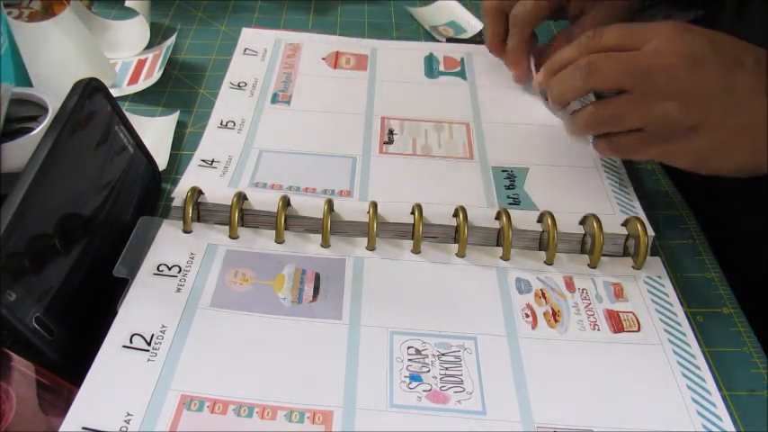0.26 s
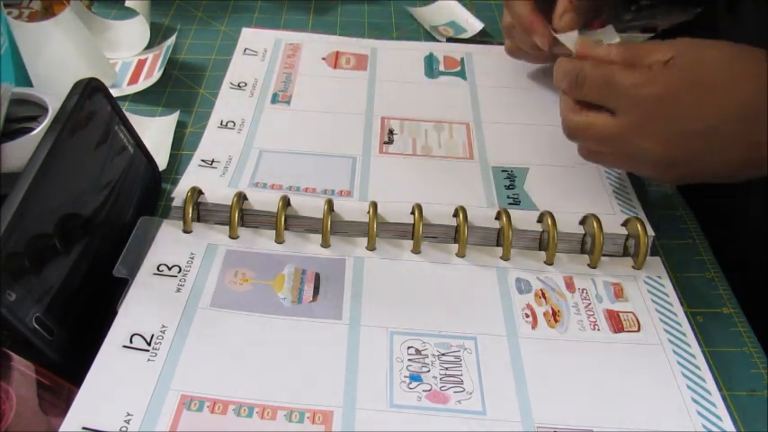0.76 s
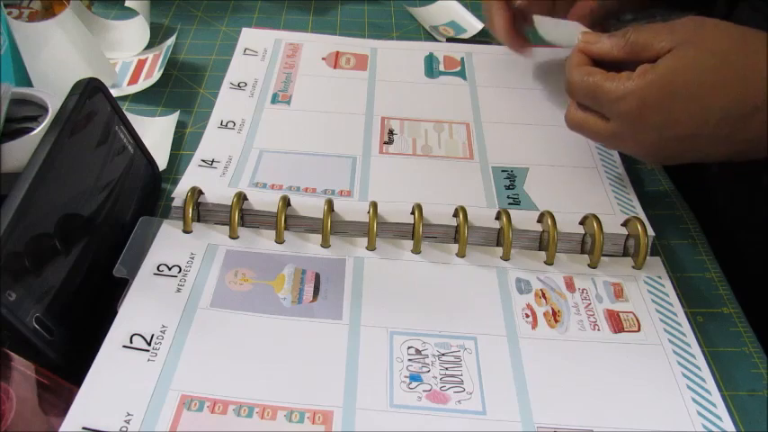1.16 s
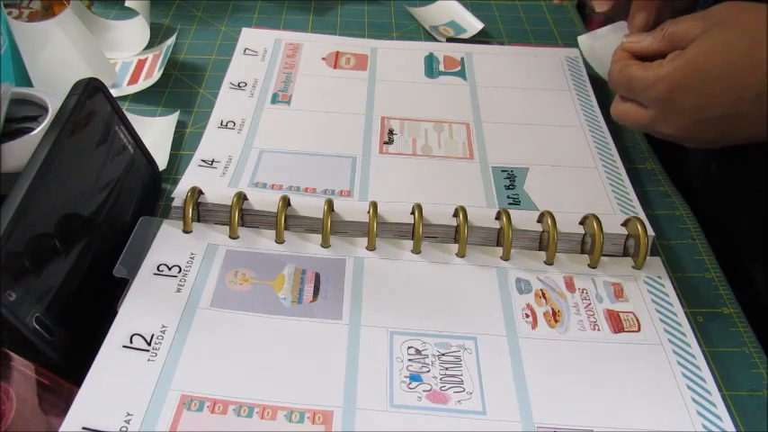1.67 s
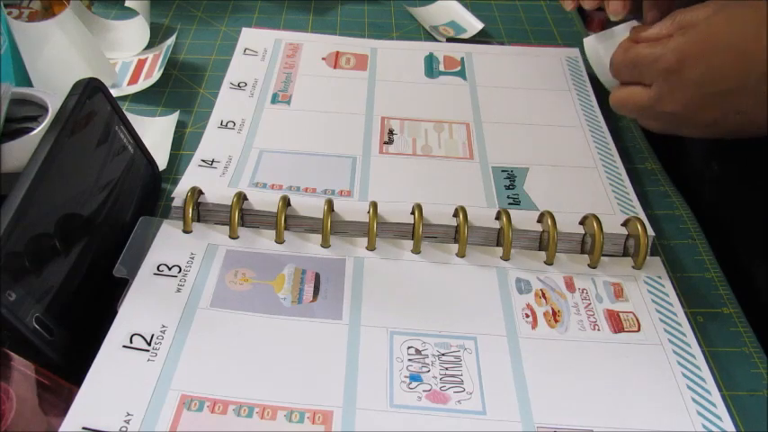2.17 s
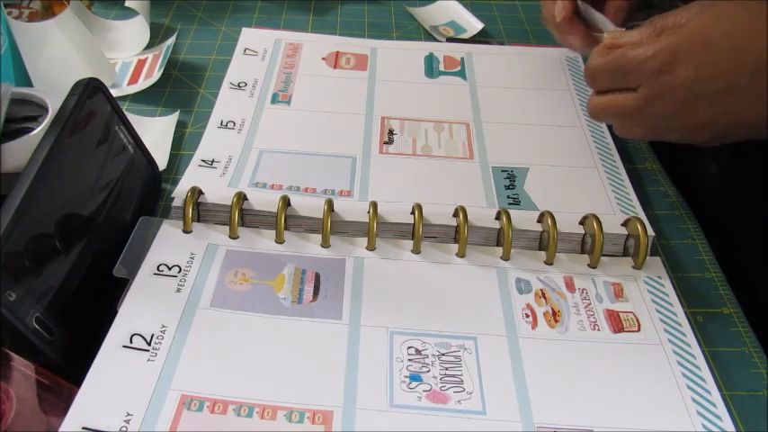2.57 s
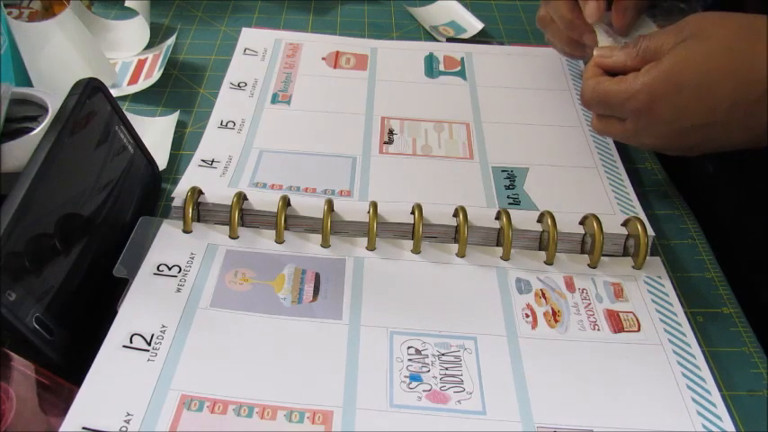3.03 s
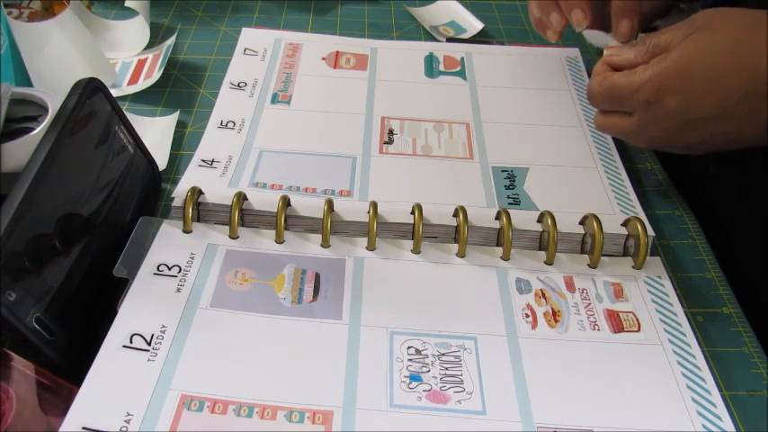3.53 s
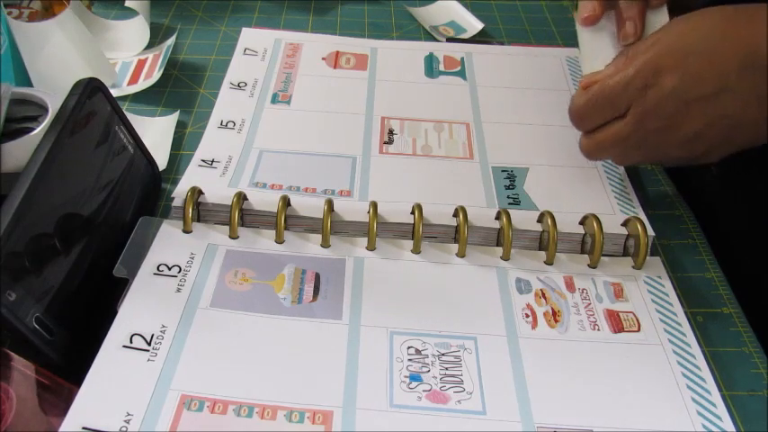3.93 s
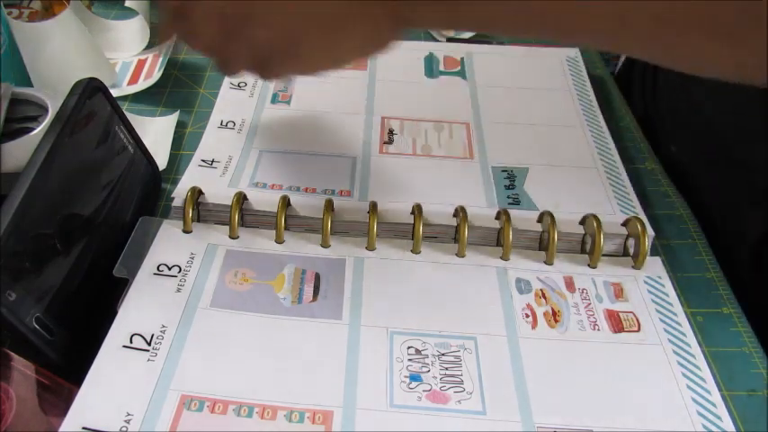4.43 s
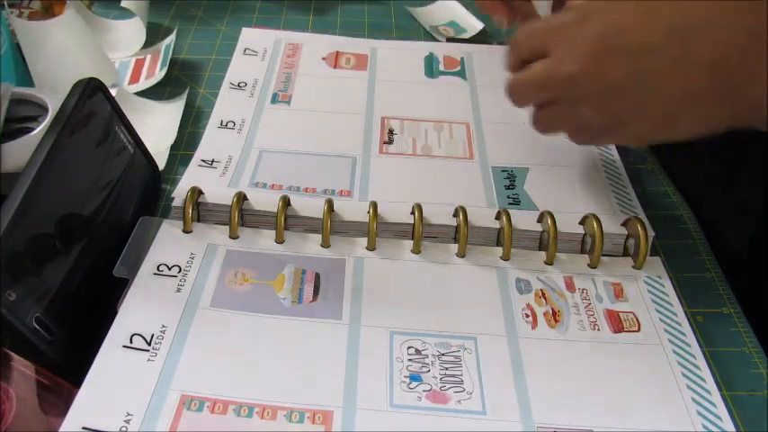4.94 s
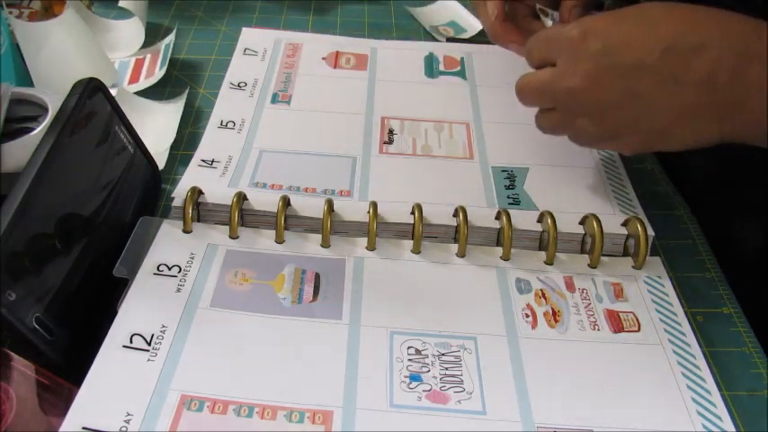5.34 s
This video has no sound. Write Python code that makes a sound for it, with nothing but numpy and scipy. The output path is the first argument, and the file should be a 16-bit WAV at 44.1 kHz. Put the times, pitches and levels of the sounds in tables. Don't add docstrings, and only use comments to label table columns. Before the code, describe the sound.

Quiet desk work: soft paper rustling and tiny crackles, then a sheet slaps down with brisk snaps, while a machine hums faintly behind.

```python
import sys
import numpy as np
from scipy import signal
from scipy.fft import rfft, irfft, next_fast_len
from scipy.io import wavfile
from scipy.ndimage import uniform_filter1d

SR = 44100
rng = np.random.default_rng(int(sys.argv[2]) if len(sys.argv) > 2 else 0)


def store_pcm(level_fs):
    pcm = np.round(np.clip(level_fs, -1, 1) * 32767).astype(np.int16)
    wavfile.write(sys.argv[1], SR, np.atleast_2d(pcm).T)


def level_to_linear(level):
    exponent = np.asarray(level, float) / 20
    return 10 ** exponent


N = 246959

# (frequency [Hz], density [dB per Hz])
ROOM_MID_COLOUR = [(33, -21), (48, 5), (80, -9), (120, -3), (330, -6), (545, -13.5), (590, -34),
                   (690, -24.5), (740, -15), (1400, -18.5), (2600, -25), (3000, -29), (9000, -30),
                   (15500, -35.5)]
# (frequency [Hz], density [dB per Hz])
ROOM_SIDE_COLOUR = [(28, -30), (48, -7), (130, -4.5), (240, -6), (300, -8.5), (540, -16), (680, -31.5),
                    (850, -22.5), (1300, -27), (2000, -36), (3000, -43), (10000, -42), (15500, -46.5)]
# (frequency [Hz], width [Hz], level [dB])
MACHINE_WHINES = [(525, 29, -67.5), (617.6, 3.5, -75.5), (785, 13, -75), (2542, 24, -74.5)]
# (time [s], pitch [Hz], level [dB])
HUM_TRACK = [(0, 236.7, -47), (1.5, 235.6, -47.5), (3, 235.6, -47.5), (4.3, 236, -48.5),
             (5.6, 237.6, -46.5)]
# (frequency [Hz], t60 [s])
ECHO_T60 = [(500, 0.24), (2000, 0.13), (6000, 0.19), (12000, 0.15)]
# (frequency [Hz], likeness [0-1])
ECHO_LIKENESS = [(700, 0.19), (2000, 1), (4500, 1), (9000, 0.35), (13000, .2)]
# (delay [s], level [dB])
NEAR_BOUNCES = [(.0075, -14.5), (0.0101, -21), (0.017, -26)]
# (frequency [Hz], width [Hz], level [dB])
DESK_RESONANCES = [(274.7, 32, 6), (306, 27, 3), (354, 96, -10), (207, 9.6, -1)]
# (time [s], length [s], level [dB])
ARM_LEANS = [
    (3.88, 1, -53.5),
    (4.312, 0.53, -45),
    (4.378, 0.02, -38),
    (4.832, 0.235, -50.5),
    (5.208, 0.18, -59),
]
# (time [s], frequency [Hz], level [dB], t60 [s])
DESK_THUMPS = [
    (4.188, 114, -42.5, 0.17),
    (4.21, 440, -36, 0.039),
]
# (frequency [Hz], width [Hz], level [dB])
PAGE_RESONANCES = [(1213, 137, 5.5), (1331, 110, 7.5), (1703, 290, 7), (2300, 220, 8), (2600, 240, 0.5),
                   (3550, 270, 1)]
# (time [s], length [s], frequency [Hz], level [dB])
FINGER_SQUEAKS = [(-.04, 0.036, 5200, -59), (-.02, 0.059, 5480, -57.5), (-.02, 0.052, 2170, -64),
                  (.06, .04, 4010, -69), (.15, 0.14, 4900, -71), (.21, 0.031, 3650, -72),
                  (0.211, 0.073, 6330, -59), (0.282, 0.0071, 3440, -53), (0.291, 0.011, 4400, -54),
                  (0.433, 0.018, 2200, -66), (1.168, 0.033, 8930, -64), (1.164, 0.03, 4350, -62.5),
                  (1.363, 0.16, 4470, -71), (5.37, 0.037, 3470, -64), (0.108, 0.088, 430, -56),
                  (0.166, 0.09, 442, -59)]
# (frequency [Hz], density [dB per Hz])
FIBRE_COLOUR = [(1470, -31), (2500, -38), (2760, -2), (4110, -6.5), (4710, -2.5), (5450, -9), (6110, -6),
                (8950, -5), (14400, -6), (15500, -20)]
# (time [s], length [s], level [dB])
PEEL_STROKES = [(-.03, 0.052, -53.5), (.294, 0.085, -48.5), (.367, .11, -48), (.608, .11, -61),
                (1.079, 0.075, -60), (1.3, .12, -60.5), (1.376, 0.14, -64), (2.53, 0.15, -61),
                (2.87, .08, -66), (3.11, 0.16, -65), (3.37, .12, -61), (3.74, 0.21, -57.5),
                (4.261, 0.16, -50), (4.5, 0.083, -53), (4.607, 0.092, -53), (4.674, 0.14, -52.5),
                (5.304, 0.05, -55.5), (5.341, 0.15, -57), (5.47, 0.094, -52.5)]
# (time [s], length [s], level [dB])
SLIDE_STROKES = [(.245, 0.066, -54), (.728, 0.11, -62.5), (1.149, 0.052, -58), (1.65, .14, -65.5),
                 (2.676, 0.065, -61), (2.796, .038, -64), (3.026, 0.15, -66), (3.598, 0.27, -66.5),
                 (3.909, 0.19, -56.5), (4.045, 0.28, -50.5), (4.38, .11, -57), (4.85, 0.12, -55.5),
                 (4.933, 0.18, -59.5), (5.537, 0.057, -68)]
# (time [s], length [s], level [dB])
DRAG_STROKES = [(-.05, 0.27, -65), (.1, 0.32, -64), (.33, .15, -78), (.45, 0.16, -69), (1.0, 0.074, -62.5),
                (1.5, 0.16, -63.5), (4.78, 0.11, -65.5)]
# (time [s], peak [dB], bright centre [Hz], low ring [Hz], relative low ring [dB])
SHEET_LANDING = [
    (4.1935, -27, 3560, 2550, 1),
    (4.193, -30.5, 3700, 1290, 7.5),
    (4.2007, -27, 2600, 1100, 2),
    (4.2085, -23, 8750, 1090, -5),
    (4.2125, -16, 10000, 2300, -3.5),
    (4.2145, -10.5, 8900, 2300, -10),
    (4.2165, -14.5, 6600, 2400, -11),
    (4.2185, -20, 10400, 1095, -5),
]
# (time [s], peak [dB], bright centre [Hz], low ring [Hz], crackle time [s])
CRUMPLE_SNAPS = [
    (2.408, -39, 9400, 2510, 0.0026),
    (3.9056, -28, 3070, 2300, 0.0026),
    (4.6102, -32.5, 5700, 2470, 0.0098),
    (4.688, -39, 8140, 2480, 0.039),
]
# (time [s], peak [dB], bright centre [Hz], low ring [Hz])
TICK_SNAPS = [(2.407, -25.5, 8200, 4700), (0.912, -35, 11000, 2100), (4.344, -32.5, 7850, 1100),
              (4.4896, -23, 11500, 3320), (4.513, -31, 6800, 1410), (4.595, -37.5, 12000, 2460),
              (4.687, -33, 6300, 3430), (4.9, -26, 4900, 2400), (4.9898, -27.5, 8400, 2550),
              (5.3303, -43, 11800, 988)]
# (time [s], peak [dB], bright centre [Hz], low ring [Hz])
TAP_SNAPS = [(0.6705, -46, 3580, 1410), (0.7823, -35, 8600, 2080), (0.84, -36, 8460, 2300),
             (0.916, -38, 7100, 1910), (1.0417, -46, 3460, 2630), (3.788, -42, 9300, 1290),
             (3.9057, -26.5, 7950, 2300), (4.0864, -32.5, 2600, 1310), (4.3892, -39, 4540, 1900),
             (4.6946, -34, 6300, 1570), (4.752, -38, 11500, 2140), (4.89, -25.5, 8800, 2380),
             (4.901, -29.5, 4900, 1500), (5.3102, -48, 8850, 2300)]
# (time [s], peak [dB], bright centre [Hz])
FLICK_SNAPS = [
    (1.01, -49, 4530),
    (2.699, -45, 8000),
    (4.37, -22, 7900),
    (4.3712, -20, 8000),
    (4.9875, -25.5, 10600),
    (5.4964, -55, 9930),
    (5.5606, -41, 11100),
]
# (time [s], peak [dB], low ring [Hz])
FINGER_PATS = [
    (0.4988, -55, 1170),
    (3.909, -38, 1110),
    (4.078, -52, 1160),
    (4.157, -47, 1400),
    (4.165, -41.5, 1070),
    (5.5603, -51.5, 1390),
]


def evened(x):
    return x / np.sqrt(np.mean(x ** 2) + 1e-20)


def read(points, hz):
    f, value = np.transpose(points)
    return np.interp(np.log(hz + 1), np.log(f + 1), value)


def curve(rows):
    s, *columns = np.transpose(rows)
    return [np.interp(np.arange(N) / SR, s, c) for c in columns]


def add(mix, s, sound):
    at = round(s * SR)
    sound = sound[max(-at, 0):]
    part = mix[max(at, 0):][:len(sound)]
    part += sound[:len(part)]


def resonate(x, hz, width_hz):
    radius = np.exp(-np.pi * width_hz / SR)
    angle = 2 * np.pi * hz / SR
    b = (1 - radius ** 2) / 2
    return signal.lfilter([b, 0, -b], [1, -2 * radius * np.cos(angle), radius ** 2], x)


def body(x, modes):
    return sum(level_to_linear(db) * resonate(resonate(x, hz, 2 * width_hz), hz, width_hz)
               for hz, width_hz, db in modes)


def noise(colour, patchy_db, size=2048):
    hz = np.fft.rfftfreq(size, 1 / SR)
    real, imag, patches = rng.standard_normal((4 * N // size + 5, len(hz), 3)).T
    patches = uniform_filter1d(patches, size=12, axis=0)
    patches = evened(uniform_filter1d(patches, size=8, axis=1))
    spectra = (real + 1j * imag) * level_to_linear(read(colour, hz)[:, None] + patchy_db * patches)
    return evened(signal.istft(spectra, nperseg=size, noverlap=3 * size // 4)[1][:N])


def room_air():
    whines = sum(level_to_linear(db) * evened(resonate(rng.standard_normal(N), hz, width_hz))
                 for hz, width_hz, db in MACHINE_WHINES)
    mid = level_to_linear(-55.5) * noise(ROOM_MID_COLOUR, patchy_db=1.3) + whines
    side = level_to_linear(-47) * noise(ROOM_SIDE_COLOUR, patchy_db=3.0)
    return np.array([mid + side, mid - side]) * level_to_linear([[.9], [-.9]])


def hum():
    pan_db, lag_rad = 3, 0.4
    halves = np.array([[.5], [-.5]])
    hz, level_db = curve(HUM_TRACK)
    phase = 2 * np.pi * np.cumsum(hz) / SR + lag_rad * halves
    return np.sqrt(2) * level_to_linear(level_db + 0.62 + pan_db * halves) * np.sin(phase)


def tail():
    taps = np.zeros((2, SR // 2))
    slots = np.arange(120, SR // 2 - 20, 20)
    at = slots + rng.integers(0, 20, (2, len(slots)))
    np.put_along_axis(taps, at, rng.choice([-1., 1.], at.shape), 1)
    hz, t, (left, other) = signal.stft(taps, SR, nperseg=256)
    same = np.clip(read(ECHO_LIKENESS, hz), 0, 1)[:, None]
    spectra = np.array([left, same * left + np.sqrt(1 - same ** 2) * other])
    decay = level_to_linear(-60 * t / read(ECHO_T60, hz)[:, None])
    out = signal.istft(spectra * decay, SR, nperseg=256)[1]
    out *= np.minimum(np.arange(out.shape[1]) / (0.0038 * SR), 1) ** 2
    out *= level_to_linear(-3.0) / np.linalg.norm(out[0])
    near = np.zeros(out.shape[1])
    for s, db in NEAR_BOUNCES:
        near[round(s * SR)] = level_to_linear(db)
    return out + 0.64 * near + resonate(near, 1600, 1900)


def echo(x):
    turn = np.pi * 2.3 * np.arange(N) / SR
    shares = [2 / 3 * np.cos(turn + k * np.pi / 3) ** 2 for k in range(3)]
    return sum(signal.oaconvolve((share * x)[None], tail()[:, :SR // 3], axes=1)[:, :N]
               for share in shares)


def ports(x):
    treble = signal.hilbert(resonate(x, 13400, 8000), next_fast_len(N))[:N]
    side = 0.017 * treble.real + .5 * treble.imag
    return np.array([x + side, x - side])


def desk():
    rise_share, sag_db = 0.097, -8.5
    power = np.zeros(N)
    for s, length_s, db in ARM_LEANS:
        u = np.linspace(0, 1, round(length_s * SR))
        ramps = np.minimum(np.minimum(u / rise_share, 10 * (1 - u)), 1)
        add(power, s, (level_to_linear(db + sag_db * u) * ramps) ** 2)
    out = np.sqrt(power) * evened(body(rng.standard_normal(N), DESK_RESONANCES))
    t = np.arange(8000) / SR
    for s, hz, db, t60_s in DESK_THUMPS:
        add(out, s, level_to_linear(db - 60 * t / t60_s) * np.sin(2 * np.pi * hz * t))
    return out


def squeaks():
    out = np.zeros(N)
    for s, length_s, hz, db in FINGER_SQUEAKS:
        whistle = body(rng.standard_normal(8000), [(hz, 30 + 0.015 * hz, 0)])
        whistle = whistle[2000:2000 + round(length_s * SR)]
        add(out, s, level_to_linear(db) * evened(whistle) * np.hanning(len(whistle)))
    return out


def rustle():
    grains = level_to_linear(2.0 * rng.exponential(1, N)) * (rng.random(N) < 400 / SR)
    flicker = 0.5 + 0.17 * evened(signal.lfilter([1], [1, -.975], grains))
    fibres = noise(FIBRE_COLOUR, patchy_db=3.5, size=512)
    low = evened(body(rng.standard_normal(N), PAGE_RESONANCES))
    out = np.zeros(N)
    # strokes, centre [Hz], relative low body [dB]
    kinds = [(PEEL_STROKES, 7500, -8.5), (SLIDE_STROKES, 6400, -2.8), (DRAG_STROKES, 4400, 4)]
    for strokes, hz, low_db in kinds:
        bright = evened(resonate(fibres, hz, 1.44 * hz))
        sound = evened(0.26 * fibres + bright) + level_to_linear(low_db) * low
        for s, length_s, db in strokes:
            part = sound[round(abs(s) * SR):][:round(length_s * SR)]
            add(out, s, level_to_linear(db) * signal.windows.tukey(len(part), .45) * part)
    return out * flicker


def snap_rows():
    rows = [(*row, .0019) for row in SHEET_LANDING]
    rows += [(*row, -4, crackle_s) for *row, crackle_s in CRUMPLE_SNAPS]
    rows += [(*row, -8, .0011) for row in TICK_SNAPS]
    rows += [(*row, -2.5, 0.0012) for row in TAP_SNAPS]
    rows += [(*row, 1500, -16, 0.00073) for row in FLICK_SNAPS]
    rows += [(s, db, 3280, ring_hz, 8, 0.0032) for s, db, ring_hz in FINGER_PATS]
    return rows


def snaps():
    out, t = np.zeros(N), np.arange(2048) / SR
    rows = snap_rows()
    chance = rng.standard_normal((len(rows), 2, len(t)))
    for (s, db, hz, ring_hz, ring_db, crackle_s), (a, b) in zip(rows, chance):
        rise = t / np.clip(crackle_s, .0002, .0008)
        shape = rise / (1 + rise) * np.exp(-t / max(crackle_s, .0002))
        z = rfft(np.roll(a * level_to_linear(3 * b) * shape, 256))
        cracks = irfft(z / np.sqrt(uniform_filter1d(abs(z) ** 2, size=45)))[256:]
        cracks *= np.minimum(2 * rise[:len(cracks)], 1)
        sheet = 0.5 * body(cracks, [(hz, 0.12 * hz, 0)])
        sheet += 0.6 * body(cracks, [(0.74 * hz, 0.95 * hz, 0)])
        pages = body(cracks, [(ring_hz, 0.21 * ring_hz, 0)]) + 0.18 * body(cracks, PAGE_RESONANCES)
        snap = sheet / abs(sheet).max() + level_to_linear(ring_db - 2.0) * pages / abs(pages).max()
        add(out, s, level_to_linear(db) * snap)
    return out


def scene():
    paper = snaps() + rustle() + squeaks()
    return ports(paper) + echo(paper) + desk() * level_to_linear([[1.5], [-1.5]]) + hum() + room_air()


def band_limit(x):
    return signal.sosfilt(signal.butter(12, 16360, fs=SR, output="sos"), x)


def record(dry):
    low_hz, top_hz = 35.5, 15080
    thin = signal.sosfilt(signal.butter(2, low_hz, "high", fs=SR, output="sos"), dry)
    top = signal.firwin(401, top_hz, window=("kaiser", 7), fs=SR)
    return band_limit(signal.oaconvolve(thin, top[None], "same"))


dry = scene()
out = record(dry)
store_pcm(out)
```